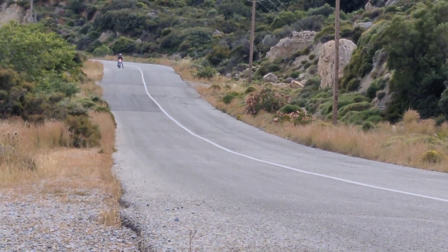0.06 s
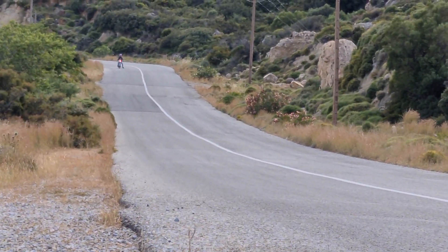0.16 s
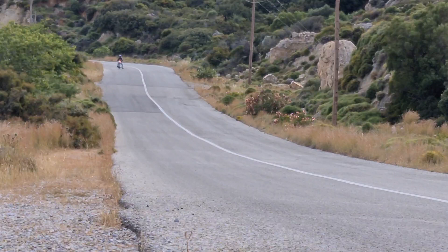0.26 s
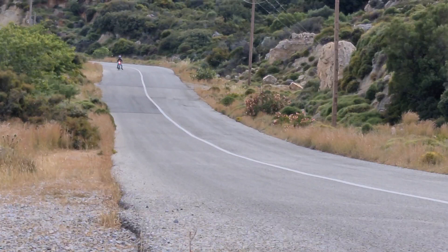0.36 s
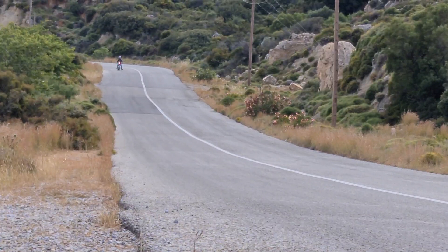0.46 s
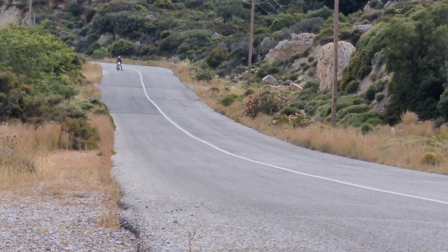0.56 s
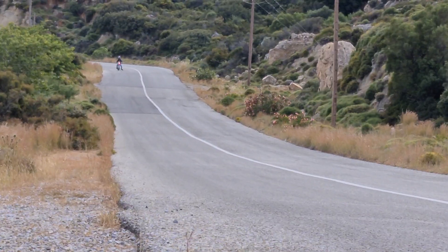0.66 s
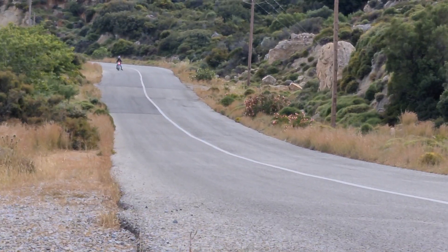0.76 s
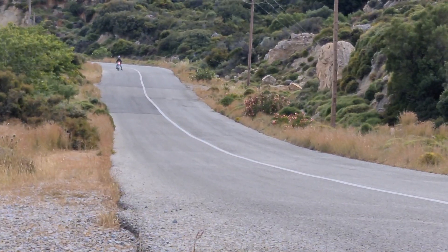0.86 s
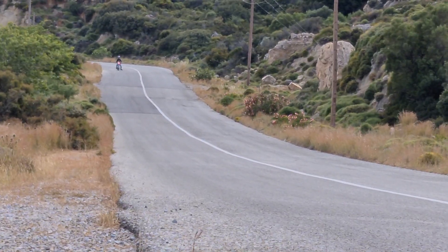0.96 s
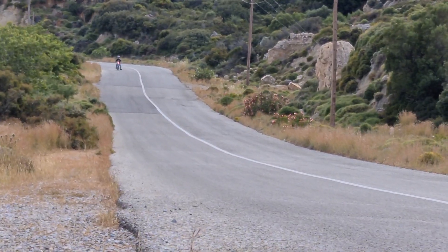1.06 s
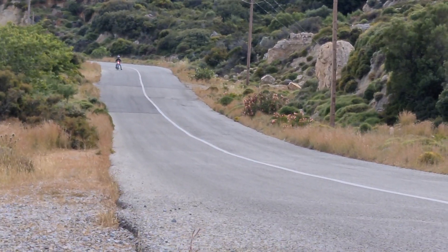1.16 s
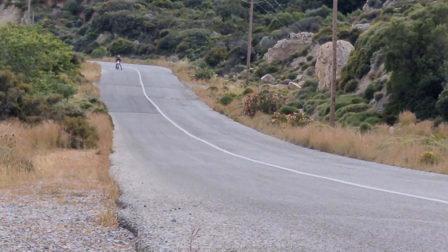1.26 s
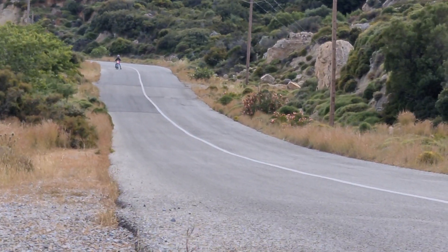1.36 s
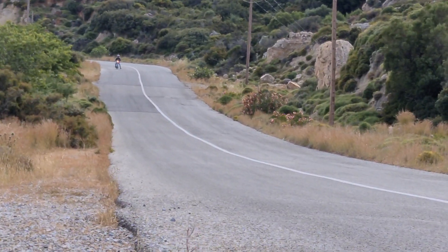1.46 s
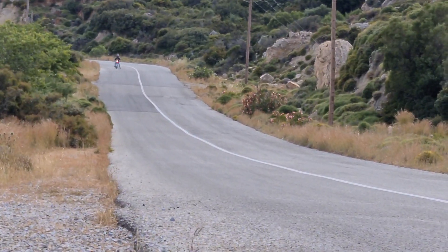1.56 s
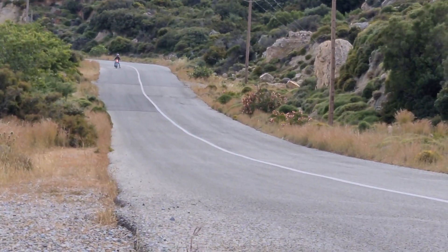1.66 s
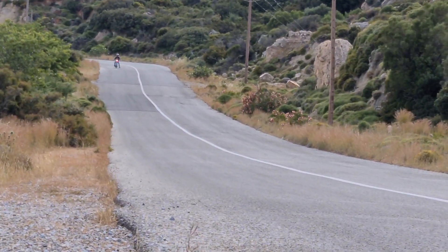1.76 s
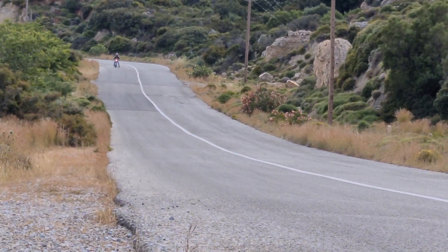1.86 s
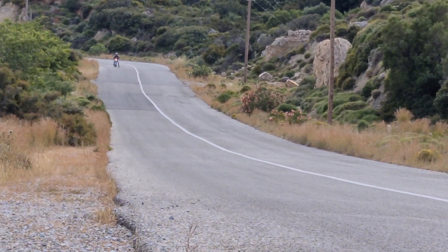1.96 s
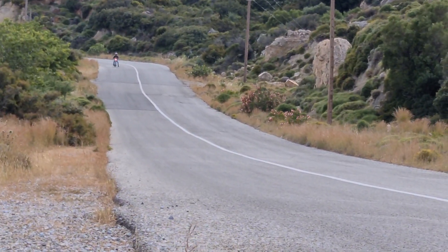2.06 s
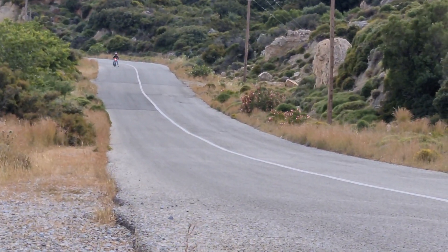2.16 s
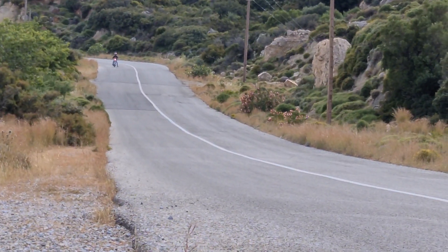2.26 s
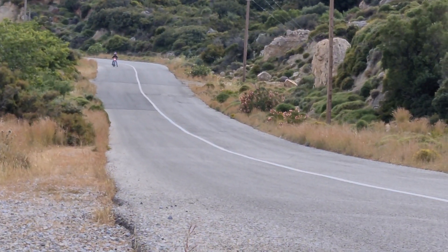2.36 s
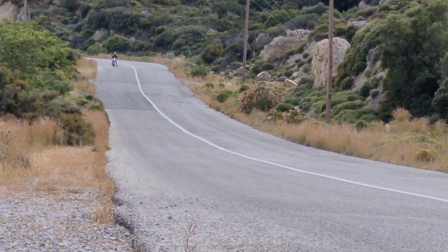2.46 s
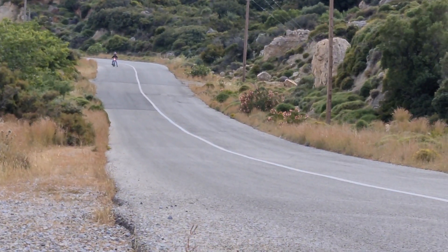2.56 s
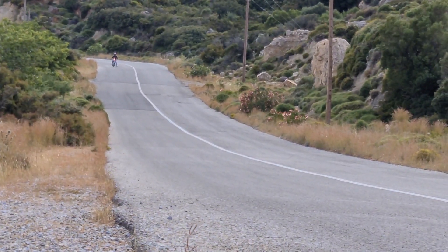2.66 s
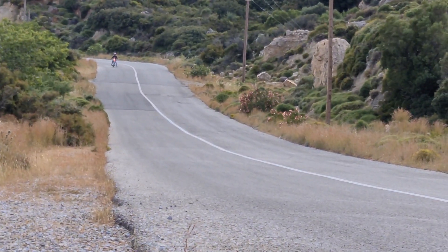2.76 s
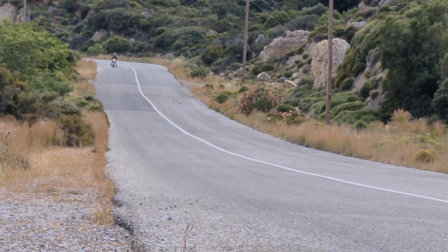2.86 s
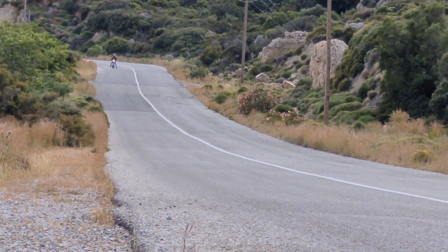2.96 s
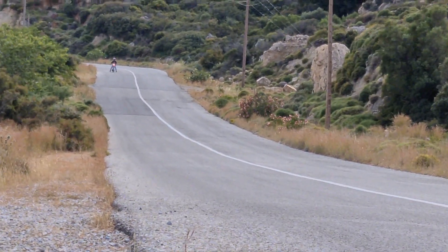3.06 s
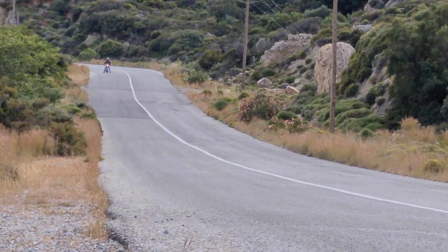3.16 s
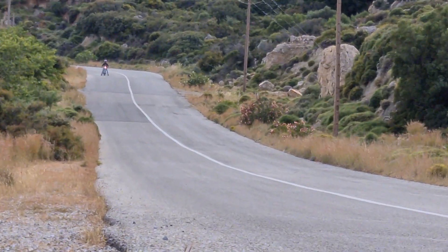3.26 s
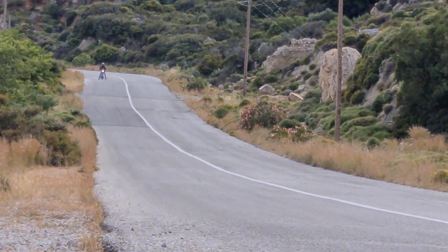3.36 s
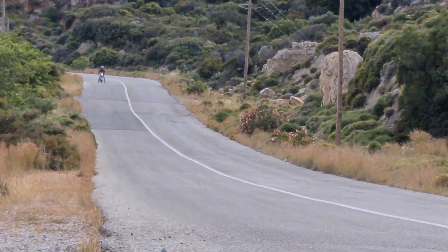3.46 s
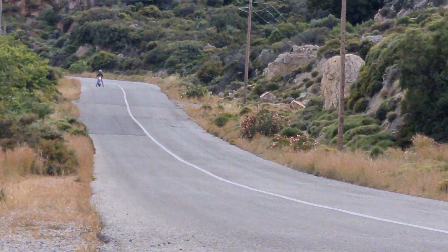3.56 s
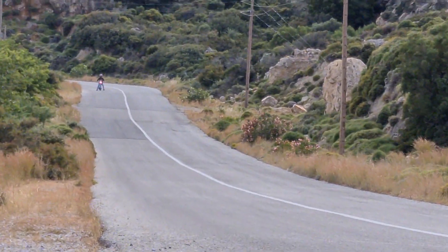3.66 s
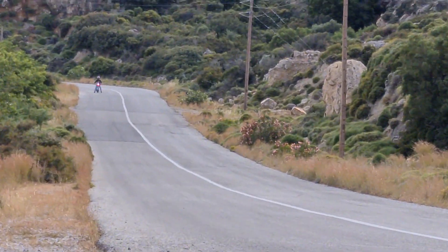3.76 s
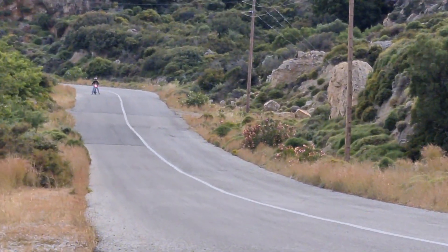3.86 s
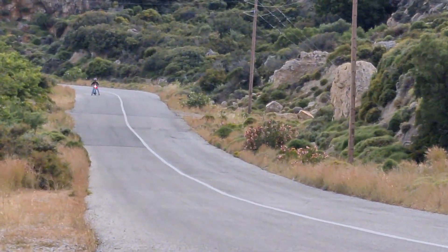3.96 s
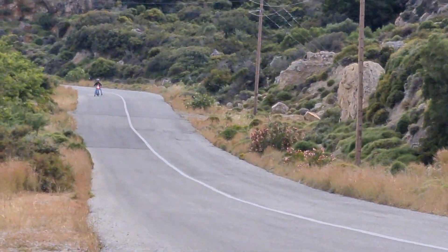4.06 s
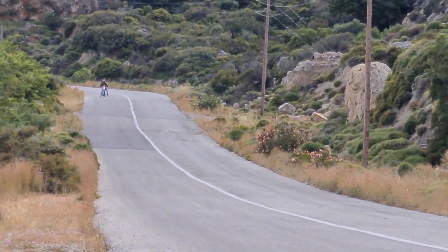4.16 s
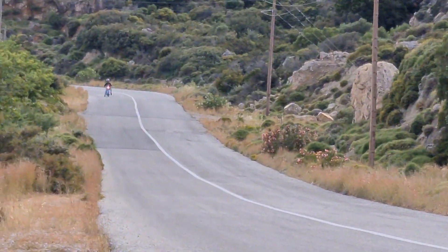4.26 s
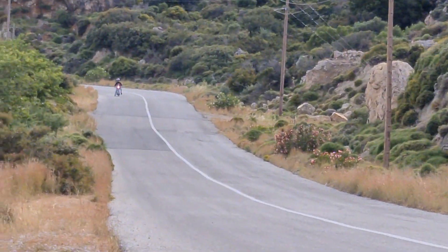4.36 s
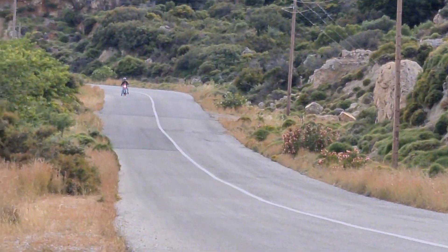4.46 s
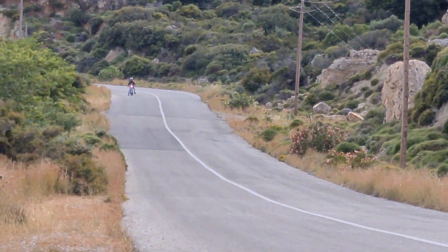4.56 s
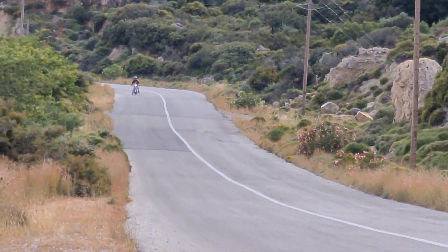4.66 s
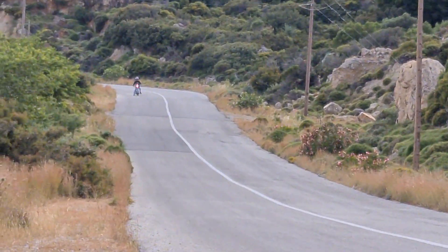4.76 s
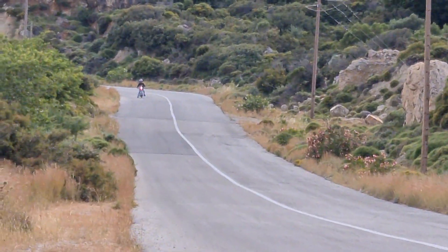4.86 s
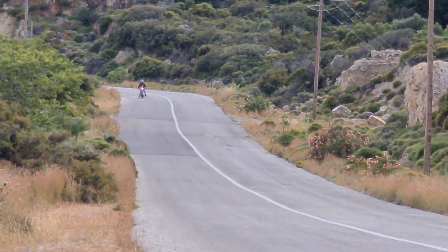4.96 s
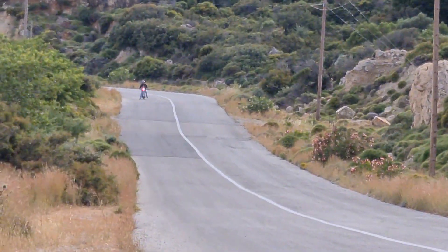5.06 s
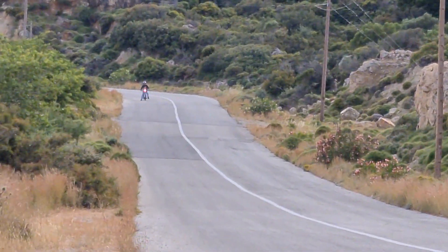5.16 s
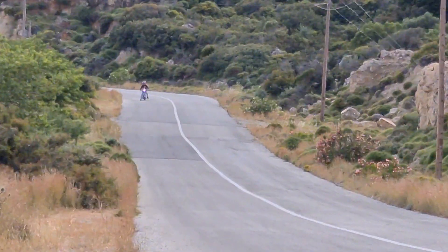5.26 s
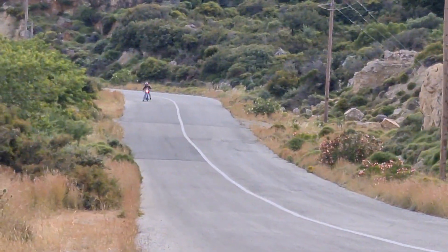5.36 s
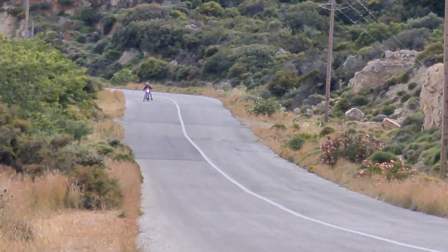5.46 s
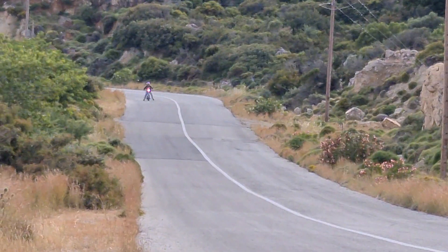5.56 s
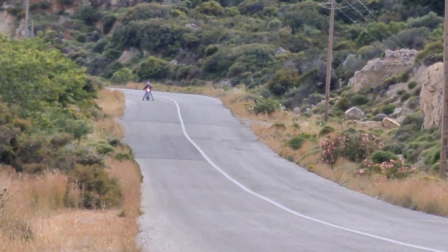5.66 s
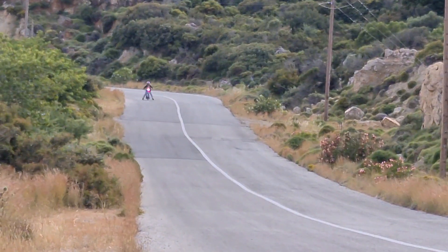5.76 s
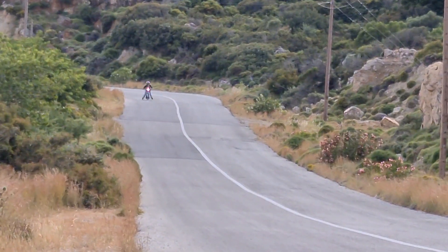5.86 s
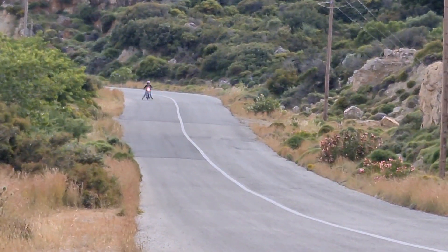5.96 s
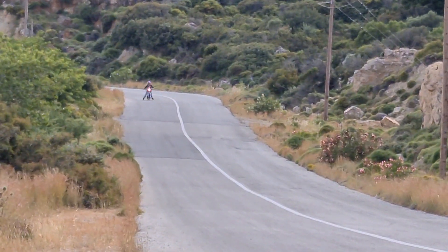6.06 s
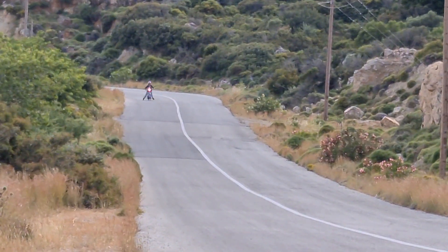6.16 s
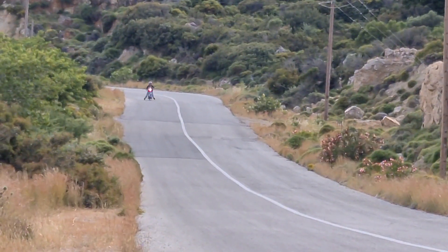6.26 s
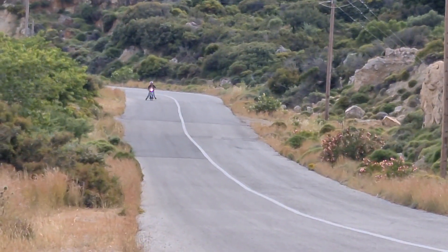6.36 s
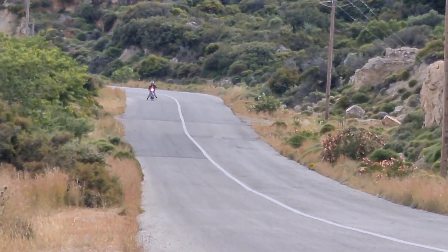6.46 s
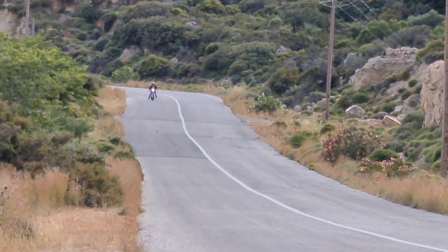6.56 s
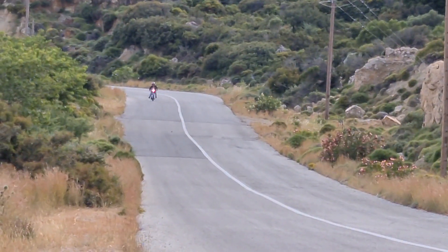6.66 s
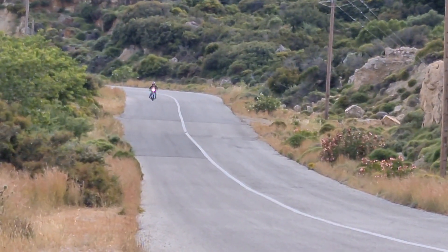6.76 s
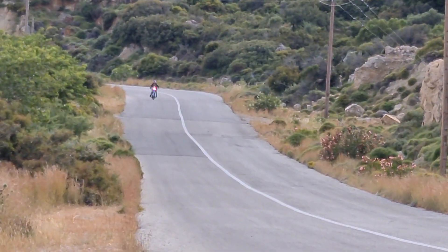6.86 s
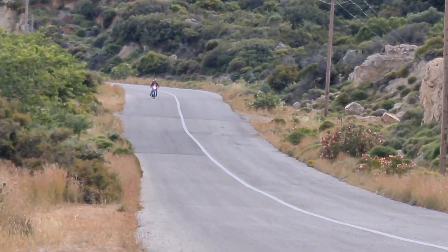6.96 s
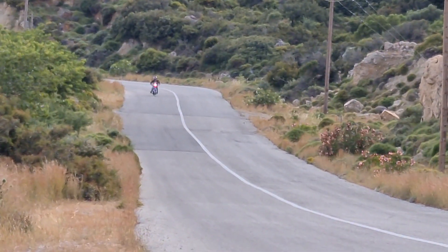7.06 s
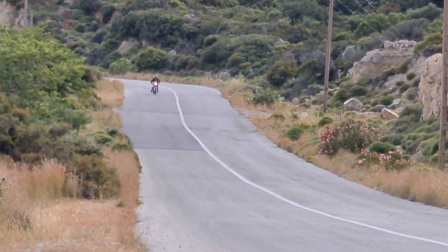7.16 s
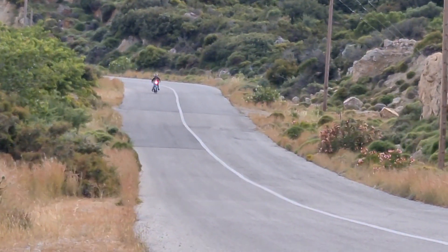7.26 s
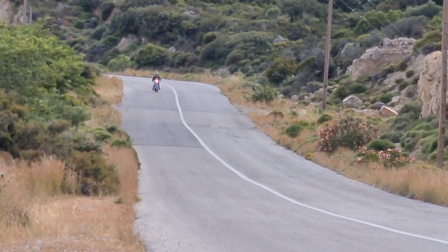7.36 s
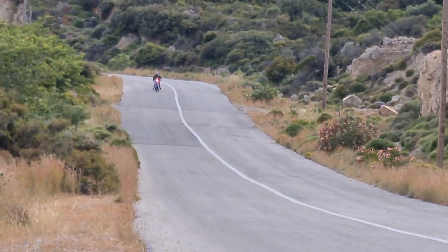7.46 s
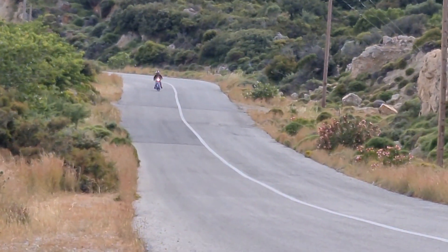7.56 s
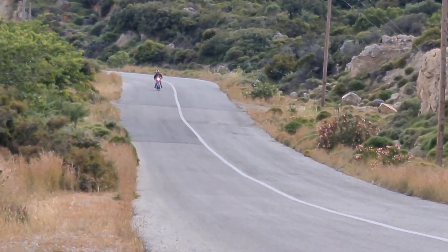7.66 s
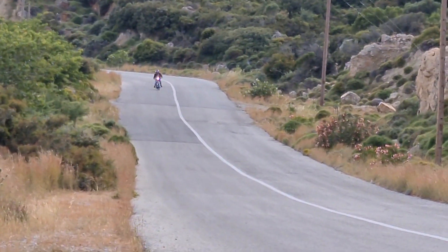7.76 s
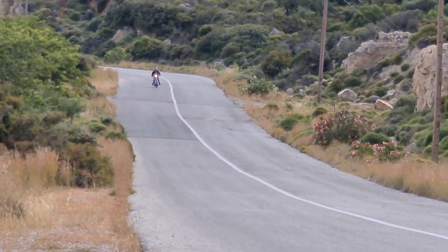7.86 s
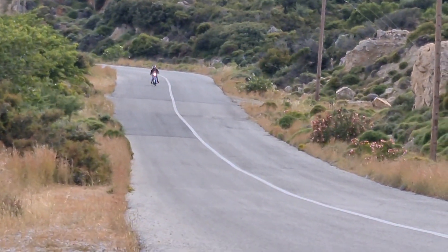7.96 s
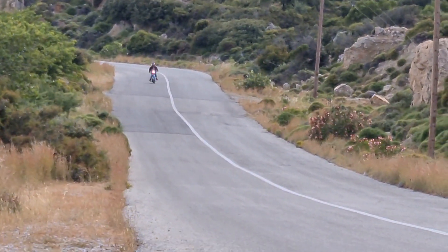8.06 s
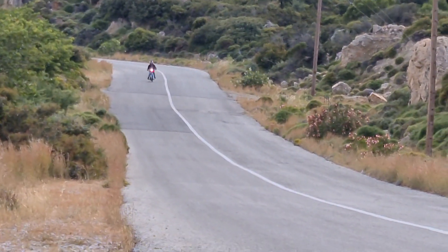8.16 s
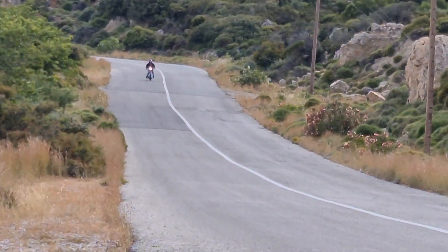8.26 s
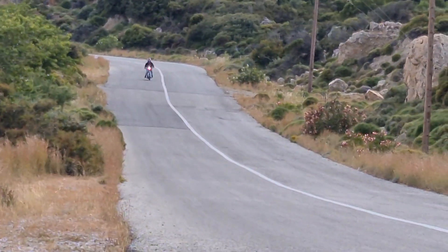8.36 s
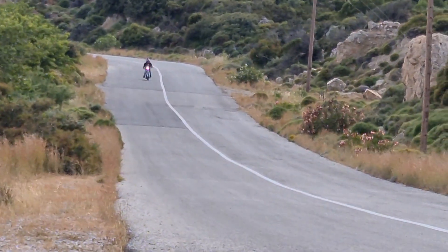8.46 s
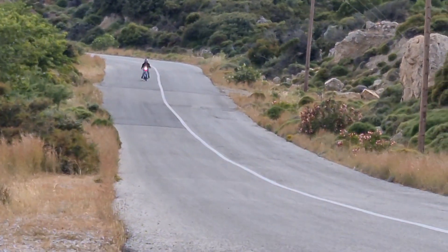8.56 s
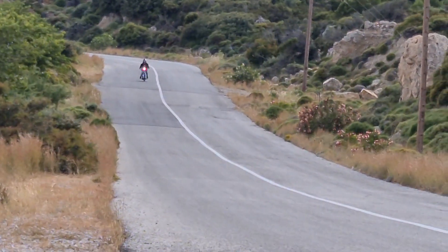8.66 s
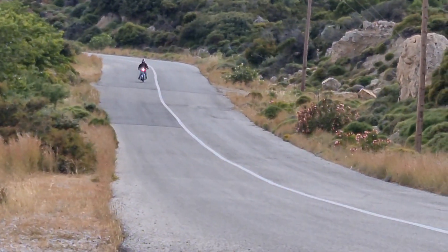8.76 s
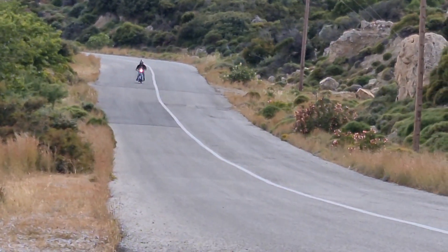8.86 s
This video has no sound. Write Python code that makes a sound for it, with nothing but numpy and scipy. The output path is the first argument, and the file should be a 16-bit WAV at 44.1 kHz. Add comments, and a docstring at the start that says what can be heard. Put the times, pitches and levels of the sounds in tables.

```python
"""A small two-stroke motorbike on a country road is blipped: one puff per crank turn excites the
resonances of its exhaust, while a scrubby hillside scatters the sound and a breeze buffets the microphone.
It sinks to a stumbling idle, where lone firings thump the cooled pipe, and is blipped twice more. It creeps
off with skipped firings and cracks of unburnt mixture, then pulls hard through a gear change, coming nearer."""
import sys
import numpy as np
from scipy import signal
from scipy.fft import rfft, irfft, next_fast_len
from scipy.io import wavfile
from scipy.ndimage import uniform_filter1d, minimum_filter1d, map_coordinates

SR = 44100
rng = np.random.default_rng(int(sys.argv[2]) if len(sys.argv) > 2 else 0)


def inscribe(sig):
    """Save sig as 16-bit PCM at rate SR to the path in sys.argv[1].

    A 1-D sig is mono; a 2-D sig holds one channel per row.
    Samples are clipped to [-1, 1] before scaling.
    """
    pcm = np.round(np.clip(np.atleast_2d(sig).T, -1, 1) * 32767)
    wavfile.write(sys.argv[1], SR, pcm.astype(np.int16))


N = 393372
TIME = np.arange(N) / SR


def amp(db):
    """Amplitude ratio of a level in decibels."""
    return 10 ** (np.asarray(db) / 20)

def unit(x):
    """Normalisation to rms 1."""
    return x / np.sqrt(np.mean(x ** 2) + 1e-20)

def along(points, hz):
    """Interpolation of (f/Hz, value) points on a logarithmic frequency axis."""
    f, values = np.transpose(points)
    return np.interp(np.log(hz + 1), np.log(f + 1), values)

def curve(points):
    """Linear interpolation of (t/s, value) points at every sample."""
    return np.interp(TIME, *np.transpose(points))

def bump(s, width):
    """Gaussian window of height 1 around time s."""
    bell = np.zeros(N)
    near = np.arange(max(0, int((s - 4 * width) * SR)), min(N, int((s + 4 * width) * SR)))
    bell[near] = np.exp(-((near / SR - s) / width) ** 2)
    return bell

def wobble(rate):
    """Random modulation: a spline through rate knots a second."""
    return map_coordinates(rng.standard_normal(int(N * rate / SR) + 4), [TIME * rate])

def lagging(x, lag):
    """First-order relaxation towards x, with a time constant of lag seconds."""
    keep = np.exp(-1 / (lag * SR))
    return x[..., :1] + signal.lfilter([1 - keep], [1, -keep], x - x[..., :1])

def filtered(x, response):
    """Linear filtering: the spectrum of x times a complex frequency response."""
    size = next_fast_len(N + SR // 2, True)
    gain = response(np.fft.rfftfreq(size, 1 / SR)).astype(np.complex64)
    return irfft(rfft(x.astype(np.float32), size) * gain, size).astype(float)[..., :N]

def coloured(x, points):
    """Zero-phase filtering by (f/Hz, gain/dB) points."""
    return filtered(x, lambda hz: amp(along(points, hz)))

def lowpass(x, edge_hz, order):
    """Zero-phase low-pass, falling 6 dB per octave for each order."""
    return filtered(x, lambda hz: 1 / (1 + (hz / edge_hz) ** order))

def resonate(x, modes, sign=-1):
    """Superposition of (f/Hz, width/Hz, gain/dB) modes; sign 1 leaves notches between, -1 fills them."""
    return filtered(x, lambda f: 1j * f * sum(sign ** k * amp(db) * w / (hz * hz - f * f + 1j * f * w)
                                              for k, (hz, w, db) in enumerate(modes)))

def impulses(times, sizes):
    """Impulse train, each impulse shared between its two nearest samples."""
    at = np.clip(times * SR, 0, N - 2)
    i = at.astype(int)
    return np.bincount(i, sizes * (1 - at + i), N) + np.bincount(i + 1, sizes * (at - i), N)


# twists of the grip: open t/s, shut t/s, throttle 0-1, loss of every second firing 0-1,
# boom gain/dB, pipe gain/dB, treble gain/dB
GRIP_TWISTS = [(-.05, 0.088, 0.5, 0.2, 3.5, 2.5, 5.5), (3.39, 3.602, 0.72, 0, -1, 4, 3.5),
               (3.964, 4.196, 0.6, 0.58, -1, 7, 2), (4.208, 4.296, 0.8, 0.5, 3, -1, -1),
               (4.286, 4.431, 0.3, 0.2, -5, -6, 1), (4.446, 5.002, 0.62, 0.62, -2.5, 5, -1.5),
               (5.017, 5.029, 1, 0, 8, 23.5, -7), (5.036, 6.136, 0.55, 0.1, -1, -3, -0.5),
               (6.106, 7.73, 0.88, 0, -2.5, 1, -1.5), (7.703, 7.81, 0.6, 0.2, -3.5, 6, -1.5),
               (7.802, 7.9, 0.66, 0.6, -10, 0, 0), (7.9, 9, 0.88, 0, -2.5, 0.5, -1)]

def grip():
    """Step input: each twist holds its settings from opening to shutting; in between all are zero."""
    held = np.zeros((len(GRIP_TWISTS[0]) - 2, N))
    for opened, shut, *settings in GRIP_TWISTS:
        held[:, (TIME >= opened) & (TIME < shut)] = np.array(settings)[:, None]
    return held

# crank speed: t/s, speed/(turns/s)
CRANK_SPEED = [(0, 54.3), (.1, 60.6), (.2, 56.6), (.3, 49.6), (.55, 39.7), (.75, 30.5), (1.2, 29.3),
               (3.33, 25.2), (3.38, 21.2), (3.5, 46.2), (3.58, 56.65), (3.75, 47.3), (3.97, 37.95),
               (4.1, 55.05), (4.2, 63.3), (4.28, 62.6), (4.38, 57.95), (4.6, 57.65), (5.0, 60.3),
               (5.1, 63.5), (6.1, 64), (6.21, 76.2), (6.44, 84.5), (6.51, 86.6), (6.72, 83.3), (6.84, 79.4),
               (7.04, 71.5), (7.09, 70.5), (7.35, 90), (7.51, 100.5), (7.65, 107.2), (7.79, 106.8),
               (7.86, 99.3), (7.94, 96.5), (8.01, 84), (8.06, 72.7), (8.31, 80.1), (8.92, 96.4)]

def running(flywheel_s=.051, grip_lag_s=.021, cool_below=42.5, cool_range=12):
    """Inertia smooths crank speed and throttle; below cool_below turns/s the unloaded pipe cools."""
    speed = uniform_filter1d(curve(CRANK_SPEED), int(flywheel_s * SR), mode="nearest")
    opening, skip = np.clip(grip()[:2], 0, 1)
    throttle = lagging(opening, grip_lag_s)
    cool = np.clip((cool_below - speed) / cool_range, 0, 1) * (1 - throttle)
    return surging(speed), throttle, skip, cool

def crank_turns(speed, start_turn=.21):
    """Phase is the integral of speed; at idle it slips so that every pop falls on a whole turn."""
    turns = start_turn + np.cumsum(speed) / SR
    popped = np.array(IDLE_FIRINGS + SHARP_FIRINGS[:1])[:, 0]
    free = np.interp(popped, TIME, turns)
    slip = np.cumsum(np.round(np.diff(free, prepend=0))) - free
    return turns + np.interp(TIME, [popped[0] - .1, *popped], [0, *slip])

def firings(turns, rough, skip, jitter_s=.00012, spread_db=3):
    """Period doubling: one puff per turn, but poor scavenging weakens every second one."""
    stroke = np.arange(int(turns[-1]) + 1)
    at = np.searchsorted(turns, stroke).clip(0, N - 1)
    luck = rng.standard_normal((len(stroke), 2))
    times = np.interp(stroke, turns, TIME) + jitter_s * rough[at] * luck[:, 0]
    opened = np.array(GRIP_TWISTS)[:, 0]
    first = np.searchsorted(times, opened)[np.searchsorted(opened, times) - 1]  # of the latest twist
    caught = 1 - skip[at] * ((stroke - first) % 2)
    return impulses(times, amp(spread_db * rough[at] * luck[:, 1]) * caught)

# crank harmonics that ring out for a while: t/s, half-width/s, order, gain
RINGING_ORDERS = [(.16, .1, 3, 1.3), (.12, .12, 5, 1), (.18, .08, 7, .9), (.3, .2, 4, 1), (.62, .2, 3, 1.5),
                  (.65, .15, 4, 1), (3.55, .06, 5, 1.5), (3.82, .14, 4, 1.5), (4.12, .08, 5, 1.8),
                  (3.53, .06, 9, .7), (4.08, .07, 9, .7), (4.19, .06, 8, .8), (5.6, .55, 2, 1.8),
                  (5.6, .55, 4, .6), (5.6, .55, 5, .5), (5.6, .55, 6, 1.3), (5.6, .55, 7, .8),
                  (6.55, .3, 10, 1.2), (6.5, .25, 9, 1.1), (6.5, .08, 23, 1.2), (6.8, .12, 24, 1.2),
                  (7.2, 1.0, 1, .8), (7.72, .08, 14, 2), (7.76, .07, 17, 2), (7.855, .045, 7, 2.6),
                  (7.85, .045, 8, 3.2), (8.6, .35, 9, .6)]

def chamber_song(speed, turns, chamber_hz=485, width_hz=76):
    """Resonance: the sixth harmonic swells as it passes the chamber's pitch; others ring at set times."""
    sixth = 1.15 * np.exp(-((6 * speed - chamber_hz) / width_hz) ** 2)
    rings = sum(gain * bump(s, width) * np.cos(2 * np.pi * order * turns)
                for s, width, order, gain in RINGING_ORDERS)
    return 2 * speed / SR * (sixth * np.cos(12 * np.pi * turns) + rings)

def turbulence(puffs, life):
    """Jet noise: a stereo burst in proportion to each puff, its power decaying in life seconds."""
    keep = np.exp(-1 / (life * SR))
    power = signal.lfilter([1 - keep], [1, -keep], puffs ** 2)
    mid, side = rng.standard_normal((2, N))
    side = coloured(side, [(500, -19), (1000, -18), (2000, -5.5), (4000, -6)])
    return np.sqrt(np.abs(power)) * np.array([mid + side, mid - side])

# exhaust resonances: f/Hz, width/Hz, open-throttle gain/dB, shut-throttle gain/dB
HOT_MODES = [(81, 36, -20.5, -33), (211.6, 23, -11, 8), (303, 110, -5.5, 0.5), (527.5, 50.7, 11, 13.5),
             (711, 68, 6, -22), (861.6, 17, -5, 5), (1094, 45, -8.5, -4.5), (1417, 210, -6, -9.5),
             (1658, 130, 0.5, -13), (1843, 110, -0.5, -14.5), (3240, 240, -47, -37.5),
             (4770, 640, -18.5, -44)]
# tuning by gas temperature: speed/(turns/s), pitch factor
HEAT_TUNING = [(28, .83), (42, .95), (60, 1.03), (80, 0.968), (108, 1.076)]

def hot_pipe(gas, speed, throttle, cool, shut_drop=.09, cooling_s=.1):
    """Sound travels faster in hotter gas, so all the pipe's modes shift together with revs and load."""
    heat = np.interp(speed, *np.transpose(HEAT_TUNING))
    heat *= 1 - shut_drop * lagging(1 - throttle, cooling_s)
    # steady modes on a clock that runs at the rate heat are gliding modes in real time
    clock, n = np.cumsum(heat), np.arange(N)
    back = np.interp(n, clock, n)
    modes, rung = np.array(HOT_MODES), 0
    for share, gain_column in [(throttle, 2), (.5 * (1 - throttle - cool), 3)]:
        warped = np.array([np.interp(back, n, side) for side in gas * share]) * (n < clock[-1])
        rung = rung + resonate(warped, modes[:, [0, 1, gain_column]], sign=1)
    return np.array([map_coordinates(side, [clock], mode="nearest") for side in rung])

# tones that build up slowly: f/Hz, width/Hz
SLOW_MODES = [(330, 220), (530, 260), (560, 400), (760, 220), (1050, 260), (1400, 400), (1800, 200),
              (2050, 220), (3400, 300), (5000, 400)]

def building(x):
    """All-pass group delay: the pipe's tones lag the wave front, taking a few round trips to build."""
    def lag(f):
        pole = np.prod([1 - (f / hz) ** 2 + 1j * f * width / hz ** 2 for hz, width in SLOW_MODES], axis=0)
        return np.conj(pole) / pole
    return filtered(x, lag)

# flaring resonances: t/s, half-width/s, f/Hz, width/Hz, gain/dB
SHELL_FLARES = [(0.039, 0.044, 1110, 88, 21.5), (0.077, 0.032, 1365, 77, 4), (0.06, .12, 5120, 210, 16),
                (.2, 0.068, 3600, 500, 16), (2.6, 0.017, 1800, 110, 12.5), (3.4, 0.016, 2380, 100, 8),
                (3.9, 0.022, 1000, 120, 4), (3.569, 0.14, 1300, 110, 3.5), (5.601, 0.3, 930, 231, 8),
                (2.9, 0.021, 1700, 250, 8.5), (4.0, 0.3, 5600, 70, 15.5), (4.75, 0.27, 720, 130, 0.5),
                (4.1, 0.6, 215, 36, 3.5), (4.879, 0.12, 1820, 150, 13.5), (6.8, 0.69, 1990, 160, 10.5),
                (6.98, 0.18, 1100, 120, 13), (5.9, 0.57, 3400, 370, -2), (7.55, 0.42, 4900, 240, 7.5),
                (8.65, 0.25, 4950, 250, 6)]

def flaring(x):
    """Narrow-band resonance: single modes of the pipe and its steel shell stand out for a moment."""
    return x + sum(amp(db) * signal.lfilter(*signal.iirpeak(hz, hz / width_hz, SR), x * bump(s, width))
                   for s, width, hz, width_hz, db in SHELL_FLARES)

def baffles(x, life=.011, scatter_db=-9):
    """Early reflections from baffles and road trail each puff and shift as the bike moves."""
    t = np.arange(SR // 25) / SR
    trails = rng.standard_normal((2, len(t))) * np.exp(-t / life)
    shift = wobble(3)
    late = sum(share * signal.oaconvolve(x, trail[None] / np.linalg.norm(trail), axes=1)[:, :N]
               for share, trail in zip([np.cos(shift), np.sin(shift)], trails))
    tone = [(200, -6), (500, -2), (1000, 2), (2200, 4), (3500, 1), (5200, -5), (8000, -2)]
    return x + amp(scatter_db) * coloured(late, tone)

# combustion, most ragged on part throttle: throttle 0-1, roughness 0-1
COMBUSTION_ROUGHNESS = [(0, .14), (.5, .42), (.7, .09), (1, .11)]
# spectrum of the gas jet: f/Hz, gain/dB
JET_TONE = [(100, -14), (500, -17), (1000, -12), (2000, -9), (4000, 6)]
# transmission of the silencer: f/Hz, gain/dB
SILENCER_TONE = [(2200, 6.5), (2600, -7), (3200, 1.5), (5000, -13.5), (6500, -17.5), (7500, -27.5),
                 (9000, -41), (14000, -37.5)]

def exhaust(speed, throttle, skip, cool, idle_roughness=.25):
    """Source and filter: pressure steps (low tones) and jet turbulence (treble) ring the pipe."""
    rough = np.interp(throttle, *np.transpose(COMBUSTION_ROUGHNESS)) + idle_roughness * cool
    turns = crank_turns(speed)
    puffs = firings(turns, rough, skip)
    step_tone = [(500, -28), (1000, -23), (2200, -27.5), (3500, -17.5), (7000, -19)]
    step = coloured(puffs + chamber_song(speed, turns), step_tone)
    gas = step + rough * coloured(turbulence(puffs, life=.005), JET_TONE)
    rung = resonate(gas * cool * .5, COOL_MODES) - hot_pipe(gas, speed, throttle, cool)
    radiated = rung - lowpass(rung, edge_hz=54, order=6)  # an open pipe radiates no deep bass
    return coloured(baffles(flaring(building(radiated))), SILENCER_TONE)

# the five registers on open throttle: speed/(turns/s), then level/dB of boom, pipe, bark, rasp, hiss
OPEN_LEVELS = [(41, -22.5, -21, -29.5, -41.5, -72.5), (63.85, -21, -16.5, -26, -36, -53),
               (74.7, -14, -17.5, -21.5, -30, -41.5), (86.3, -17, -13.5, -19, -35, -41),
               (89, -14, -18, -18.5, -33, -42), (104, -12.5, -20.5, -16, -28.5, -41)]
# change with the throttle shut, per register: gain/dB
SHUT_GAINS = [1.5, -14.5, -2, -9.5, -3.5]
# growth as the bike nears, per register: rate/(dB/s)
APPROACH_RATES = [0.72, 1, 0.94, 0.93, 0.11]
# weak puffs between the idle pops, per register: level/dB
IDLE_LEVELS = [-34, -57, -63.5, -78, -91]
# response to a change of treble, per register: share 0-1
TREBLE_SHARES = [0.22, 0.1, 1, 0.85, 0.26]
# treble at idle, of which puffs and pops each take a share: t/s, gain/dB
IDLE_BRIGHTNESS = [(.8, 12.5), (1.15, -5), (2.45, 4.5), (2.72, 16.5), (3.15, 5.5), (3.38, 23)]

def register_levels(speed, cool, lag_s=.055, idle_share=.52):
    """Band levels follow speed, load and nearness, and sink to their idle values as the pipe cools."""
    throttle, _, boom_db, pipe_db, treble_db = lagging(grip(), lag_s)
    speeds, *open_db = np.transpose(OPEN_LEVELS)
    pulling = np.array([np.interp(speed, speeds, db) for db in open_db])
    pulling += np.outer(SHUT_GAINS, 1 - throttle)
    pulling += np.outer(APPROACH_RATES, TIME - 6)  # 0 dB at 6 s
    pulling += np.outer(TREBLE_SHARES, treble_db)
    pulling[:2] += [boom_db, pipe_db]
    idling = np.array(IDLE_LEVELS)[:, None] + idle_share * np.outer(TREBLE_SHARES, curve(IDLE_BRIGHTNESS))
    return (1 - cool) * pulling + cool * idling

def swell(x, db, window_s=.1):
    """Envelope shaping: the slow rms level of x becomes db, while its single puffs survive."""
    size = int(window_s * SR)
    power = uniform_filter1d(uniform_filter1d(np.mean(x ** 2, 0), size), size)
    return x * amp(db) / np.sqrt(np.abs(power) + 1e-20)

# brief swells and dips of the rasp: t/s, half-width/s, gain/dB
RASP_CHANGES = [(0.059, 0.1, 8), (0.251, 0.22, 5.5), (3.95, 0.18, 7.5), (4.9, 0.15, 10), (5.949, 0.12, 5.5),
                (6.495, 0.066, 10), (6.79, 0.1, 9), (7.158, 0.027, -3.5), (7.359, 0.11, 2),
                (7.767, 0.051, 6.5), (8.2, 0.18, -6), (8.868, 0.064, 5)]
# brief swells and dips of the bark: t/s, half-width/s, gain/dB
BARK_CHANGES = [(0.062, 0.11, 4.5), (6.599, 0.29, 0), (7.251, 0.36, -7), (7.84, .06, 1.5)]
# weight of the top treble within the hiss: t/s, gain/dB
FIZZ_GAIN = [(.1, -16), (4.05, -15.5), (4.5, -8), (5.9, -2.5), (6.5, 5), (7.1, 1), (7.5, 5), (7.95, 3.5),
             (8.2, -2.5), (8.6, 4.5)]

def engine(hiss_follows=.57, fizz_hz=5400):
    """Spectral balance: speed and load shift the weight between five bands of the exhaust's sound."""
    speed, throttle, skip, cool = running()
    rest, out = exhaust(speed, throttle, skip, cool), 0
    boom_db, pipe_db, bark_db, rasp_db, hiss_db = register_levels(speed, cool)
    swell_db = sum(db * bump(s, width) for s, width, db in RASP_CHANGES)
    rasp_db += swell_db
    hiss_db += hiss_follows * swell_db
    bark_db += sum(db * bump(s, width) for s, width, db in BARK_CHANGES)
    for edge_hz, level_db in [(432.3, boom_db), (596, pipe_db), (1307, bark_db), (2440, rasp_db)]:
        register = lowpass(rest, edge_hz, order=20)
        out = out + swell(register, level_db)
        rest = rest - register
    fizz = rest - lowpass(rest, fizz_hz, order=20)
    return out + swell(rest + (amp(curve(FIZZ_GAIN)) - 1) * fizz, hiss_db)

# reverberation time of the hillside: f/Hz, T60/s
HILL_DECAY = [(150, 1), (500, 1), (2000, 0.99), (8000, 0.0063)]
# strength of its answer: f/Hz, gain/dB
HILL_TONE = [(150, -24), (500, -26), (900, -19), (1800, -11), (4000, -7)]

def hillside(x):
    """Diffuse scattering: rocks and scrub return a short tail, different at each ear."""
    hz, t, noise = signal.stft(rng.standard_normal((2, SR // 2)), SR, nperseg=256)
    decay = amp(-60 * t / along(HILL_DECAY, hz)[:, None])
    tail = signal.istft(noise * decay, SR, nperseg=256)[1]
    return coloured(signal.fftconvolve(x, tail / np.linalg.norm(tail[0]), axes=1)[:, :N], HILL_TONE)

# spectrum of the buffeting: f/Hz, relative level/dB
BUFFET_TONE = [(15, 0.5), (40, -0.5), (75, 0.5), (120, -3), (250, -47.5), (600, -58.5), (2000, -100)]
# gusts: t/s, half-width/s, relative level/dB
WIND_GUSTS = [(1.0, 0.23, -39), (1.301, 0.13, -39), (1.9, 0.48, -42), (2.36, 0.079, -31),
              (2.978, 0.38, -36.5), (3.371, 0.069, -39), (4.139, 0.15, -42), (4.45, 0.086, -30),
              (4.802, 0.2, -38.5), (5.573, 0.21, -29.5), (5.872, 0.054, -33), (6.131, 0.037, -22),
              (6.301, 0.14, -32.5), (6.731, 0.1, -32)]
# spectrum of the faint hiss: f/Hz, relative level/dB
HISS_TONE = [(100, 0), (1000, 16.5), (3000, 7.5), (8000, -0.5), (14000, -4)]
# course of that hiss: t/s, relative level/dB
HISS_LEVEL = [(.4, -79), (3.4, -77), (4.1, -104), (8.8, -110)]

def breeze(calm_db=-61.5, buffet_db=3.5, air_db=3, unshared=2.7):
    """Turbulent pressure: lumps of wind strike each microphone port differently, over a faint hiss."""
    rumble = coloured(rng.standard_normal(N) + unshared * rng.standard_normal((2, N)), BUFFET_TONE)
    wind = amp(calm_db) + sum(amp(db) * bump(s, width) for s, width, db in WIND_GUSTS)
    buffet = amp(buffet_db) * wind * unit(rumble * amp(.87 * wobble(19)))
    air = unit(coloured(rng.standard_normal(N) + .3 * rng.standard_normal((2, N)), HISS_TONE))
    return buffet + amp(curve(HISS_LEVEL) + air_db) * air

# lone firings at idle: t/s, relative level/dB
IDLE_FIRINGS = [(0.82, -23), (0.949, -26), (1.019, -22), (1.123, -21), (1.223, -21.5), (1.334, -28),
                (1.43, -27), (1.505, -29), (1.588, -24), (1.688, -28.5), (1.796, -25.5), (1.867, -24),
                (1.939, -24), (2.045, -30), (2.114, -27.5), (2.179, -30), (2.282, -34.5), (2.392, -25.5),
                (2.493, -29), (2.602, -27.5), (2.676, -28.5), (2.745, -27), (2.817, -24.5), (2.893, -28),
                (2.962, -25.5), (3.043, -28.5), (3.111, -26), (3.192, -24.5), (3.265, -22.5), (3.341, -28)]
# resonances of the cool pipe: f/Hz, width/Hz, gain/dB
COOL_MODES = [(170.9, 15, 9), (298.4, 20, 0), (427, 82.6, 2), (455, 107, -4), (756, 70, -13),
              (900, 13, -7.5), (1030, 160, -38), (1350, 50, -46), (1850, 180, -26.5), (2180, 120, -44),
              (3560, 700, -53.5)]

def idle_pops(gain_db=38, soft_hz=450, treble_share=.6):
    """Impulse response: at idle the charge catches only every few turns and thumps the cool pipe."""
    s, db = np.transpose(IDLE_FIRINGS)
    puffs = impulses(s + .0014, amp(db + gain_db))
    push = filtered(puffs, lambda hz: 1 / (1 + 1j * hz / soft_hz) ** 2)
    gas = turbulence(puffs * amp(treble_share * curve(IDLE_BRIGHTNESS)), life=.012)
    jet_tone = [(150, -11), (450, -3.5), (650, -10), (900, -7.5), (1500, -17), (4000, -25.5), (9000, -16)]
    rung = flaring(building(resonate(push + coloured(gas, jet_tone), COOL_MODES)))
    return coloured(baffles(rung, life=.014, scatter_db=-5), SILENCER_TONE)

# sharp firings as the throttle opens and while the bike creeps: t/s, relative level/dB
SHARP_FIRINGS = [(3.42, -24), (3.45, -24), (5.084, -16.5), (5.178, -14), (5.258, -15.5), (5.368, -12),
                 (5.447, -14), (5.543, -17), (5.621, -11), (5.698, -18), (5.79, -18), (5.886, -14.5),
                 (5.976, -17), (6.057, -11.5), (6.135, -13.5)]
# broad resonances of a crack: f/Hz, width/Hz, gain/dB
CRACK_MODES = [(650, 230, 2), (1100, 840, -10.5), (1950, 150, -7), (3250, 910, -17.5), (5200, 870, -12)]

def cracks(gain_db=28, rough=.88, soft_hz=3000):
    """Shock excitation: unburnt mixture goes off on a light throttle and rings heavily damped modes."""
    s, db = np.transpose(SHARP_FIRINGS)
    puffs = impulses(s + .00025, amp(db + gain_db))
    push = filtered(puffs, lambda hz: 1 / (1 + 1j * hz / soft_hz) ** 3)
    gas = push + rough * turbulence(puffs, life=.005)
    return coloured(resonate(gas, CRACK_MODES), SILENCER_TONE)

def surging(speed, sag_per_s=.9, kick_s=.012):
    """Angular impulse: while the bike creeps, each crack kicks the crank, which slows until the next."""
    kicks = [s for s, db in SHARP_FIRINGS[2:]]
    for kick, following in zip(kicks, kicks[1:]):
        between = (TIME >= kick) & (TIME < following)
        speed = speed * (1 - sag_per_s * (TIME - (kick + following) / 2) * between)
    return uniform_filter1d(speed, int(kick_s * SR), mode="nearest")

# level difference between the ears: f/Hz, left minus right/dB
EAR_DIFFERENCE = [(100, -1), (330, 0.65), (510, 0.5), (800, 1), (1200, 2), (1860, 10), (2850, 0),
                  (6000, 2.5)]

def scene():
    """Superposition of bike, hillside and breeze; a level difference sets the rasp to the left."""
    bike = engine() + idle_pops() + cracks()
    heard = filtered(bike + hillside(bike), lambda hz: amp(np.outer([.5, -.5], along(EAR_DIFFERENCE, hz))))
    return heard + breeze()

def record(dry, ceiling=.98, limit_s=.004, top_hz=14500):
    """Peak limiting and band limiting: a smooth gain holds peaks down, and the top treble is cut."""
    size = int(limit_s * SR)
    needed = ceiling / np.maximum(np.abs(dry).max(0), ceiling)
    held = minimum_filter1d(needed, 2 * size + 1)
    gain = uniform_filter1d(uniform_filter1d(held, size), size)
    return filtered(dry * gain, lambda hz: hz < top_hz)


dry = scene()
out = record(dry)
inscribe(out)
```